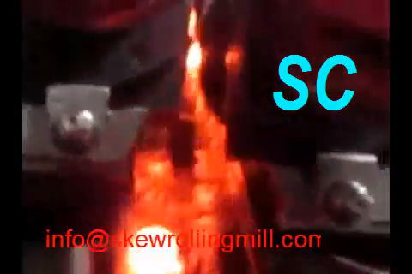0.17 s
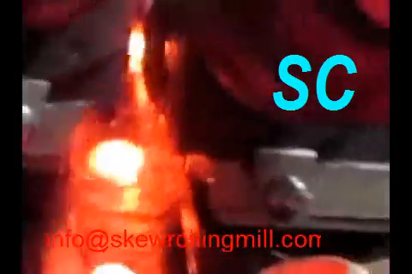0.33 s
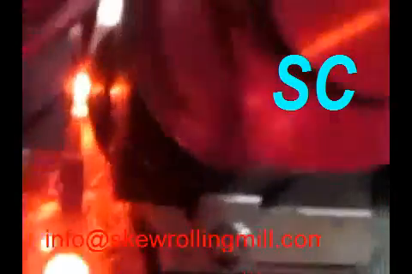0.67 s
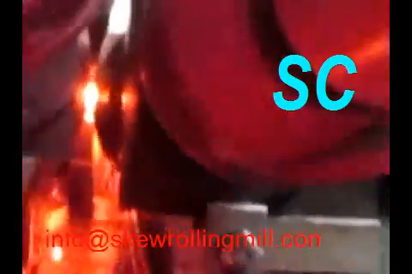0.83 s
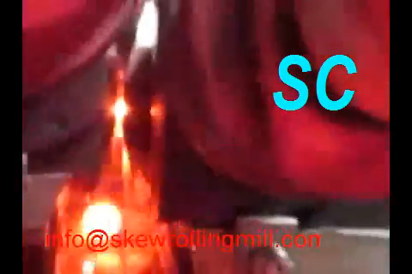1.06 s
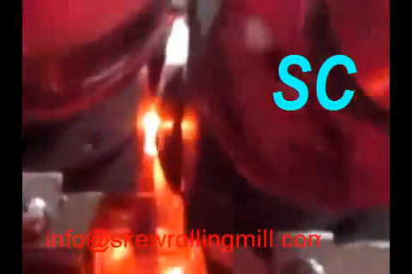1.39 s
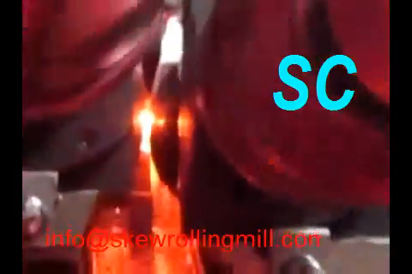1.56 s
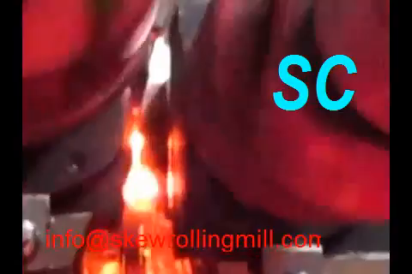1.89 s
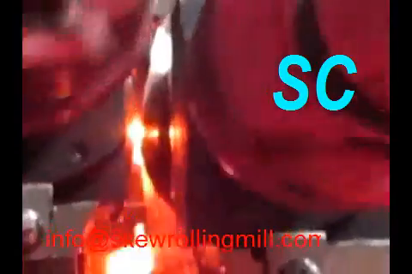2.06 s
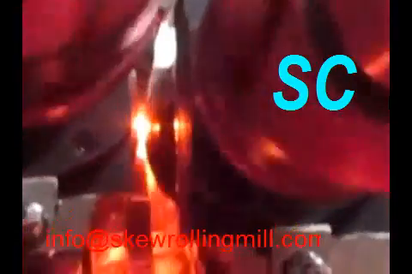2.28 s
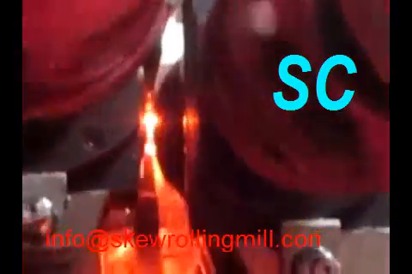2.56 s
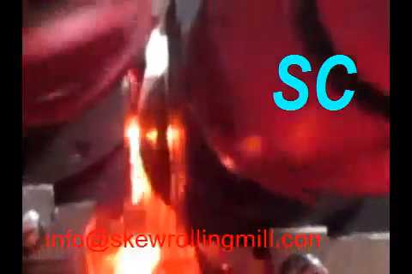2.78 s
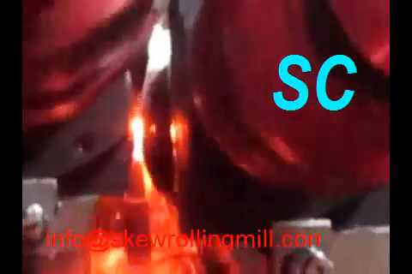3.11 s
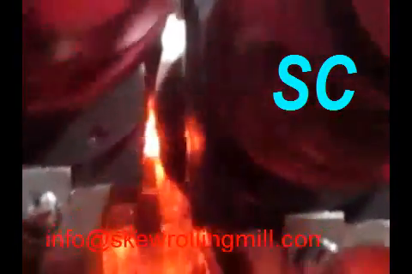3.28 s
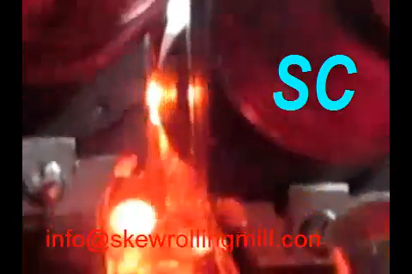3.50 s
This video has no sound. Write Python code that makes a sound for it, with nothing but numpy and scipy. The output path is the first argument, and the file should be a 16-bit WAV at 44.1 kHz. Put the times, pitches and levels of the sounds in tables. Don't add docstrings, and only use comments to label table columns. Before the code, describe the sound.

Dense, steady mill roar with a faint thin whine and pulsing gear tones; irregular hard clanks, hollow knocks and rough crashes of balls throughout, then a low groan stops short; close, dull, clipping microphone, short hall reverberation.

```python
import sys
import numpy as np
from scipy import signal
from scipy.fft import rfft, irfft
from scipy.io import wavfile
from scipy.ndimage import uniform_filter1d

SR = 44100
rng = np.random.default_rng(int(sys.argv[2]) if len(sys.argv) > 2 else 0)


def bounce(signal):
    frames = np.transpose(np.atleast_2d(signal))
    limited = np.clip(frames, -1, 1)
    pcm = np.round(limited * 32767).astype(np.int16)
    wavfile.write(sys.argv[1], SR, pcm)


def gain_from_db(level_db):
    decades = np.asarray(level_db, float) / 20
    return 10 ** decades


N = 160524
T = np.arange(N) / SR
CONTACT_S = .0013
SNAP_DB, SNAP_T60_S = 4, .015

# (time [s], peak [dB], tilt [dB/octave], mode rung hardest
# [Hz])
CLANK_EVENTS = [
    (0.6859, -2, -1, 2229),
    (0.742, -13, 0.5, 3300),
    (0.7944, -12.5, 1.5, 4150),
    (1.361, -1, -2, 3300),
    (1.4514, -12, 2, 4059),
    (2.1065, -5, 1, 1437),
    (2.271, -11.5, -2.5, 2229),
    (2.81, -21, 5.5, 3300),
    (3.0158, -3.5, 2.5, 1437),
]
# (time [s], peak [dB], low body share [dB], t60 [s])
CRASH_EVENTS = [(0.1125, -5.5, -3.5, 0.2), (0.212, -16, -4, 0.42), (0.2956, -10, -28, 0.87),
                (0.575, -18, 1.5, 0.75), (1.1287, -10, -10.5, 0.19), (1.556, -9.5, -11, 0.25),
                (2.0775, -7, -16, 0.25), (2.087, -14.5, -7.5, 0.43), (2.2035, -14.5, -8, 0.48),
                (2.38, -21, -11.5, 0.12), (2.6671, -5.5, 2.5, 0.25), (2.691, -15.5, -17, 0.23),
                (2.8977, -13, -15, 1)]


def unit(x):
    return x / np.sqrt(np.mean(x ** 2))


def curve(table):
    return gain_from_db(np.interp(T, *np.array(table).T))


def band(hz, width_hz):
    return unit(signal.lfilter(*signal.iirpeak(hz, hz / width_hz, SR), rng.standard_normal(N)))


def walk(rate_hz):
    k = int(SR / rate_hz)
    held = np.repeat(rng.standard_normal(N // k + 1), k)
    return 1.57 * uniform_filter1d(uniform_filter1d(held, k), k)[:N]


def tone(hz):
    return np.sin(2 * np.pi * np.cumsum(hz) / SR)


def add(out, at_s, x):
    i = int(at_s * SR)
    out[i:i + len(x)] += x[:N - i]


def decay(t, t60_s):
    return np.exp(-np.log(1000) * t / t60_s)


def fade(t, t60_s):
    return (1 - np.exp(-t / CONTACT_S * 3)) * decay(t, t60_s)


def roar():
    # (frequency [Hz], density [dB/Hz])
    spectrum = [(15, -50.5), (25, -49.5), (268, -12), (497, -7), (744, -12.5), (1090, -12.5), (3400, -19.5),
                (5590, -24.5), (7260, -32.5), (9440, -91.5), (16000, -120)]
    # (time [s], level [dB])
    load_levels = [(0, -19.5), (.33, -18), (.78, -21.5), (1.0, -19), (1.32, -19.5), (2.03, -21),
                   (2.31, -18.5), (2.88, -21), (3.08, -21.5), (3.3, -17), (3.475, -20), (3.49, -24.5),
                   (3.6, -25), (3.64, -23.5)]
    # (time [s], level [dB])
    scrape_levels = [(0.0, -26.5), (0.26, -28.5), (0.5, -27), (0.93, -28), (1.15, -28), (1.26, -26),
                     (1.38, -27), (1.63, -29), (1.78, -28.5), (2.06, -29.5), (2.21, -27), (2.32, -26),
                     (2.45, -28.5), (2.78, -28.5), (3.32, -28.5), (3.64, -32)]
    # (frequency [Hz], width [Hz], level [dB])
    stand_modes = [(98.3, 13, -52.5), (374.5, 13, -42.5), (443.5, 9.1, -39.5), (587.5, 19, -41.5),
                   (692, 16, -37), (840, 36, -35), (924, 12, -38.5), (1060, 72, -33), (1221, 29, -35.5)]
    roar_db, swell_db, flicker_db, scrape_db = -22.5, .5, .9, .8
    load_corner_hz = 1800
    load = unit(curve(load_levels))
    scrape = unit(curve(scrape_levels)) * gain_from_db(scrape_db * walk(14))
    swell = walk(1)
    hz, db = np.array(spectrum).T
    f = np.fft.rfftfreq(N, 1 / SR) + 1
    colour = gain_from_db(np.interp(np.log(f), np.log(hz), db))
    noise = np.zeros(N)
    for mid_hz in 25 * 2 ** np.arange(0, 8.4, 1 / 3):
        share = np.cos(np.clip(np.log2(f / mid_hz) * 3, -1, 1) * np.pi / 2)
        drive = load if mid_hz < load_corner_hz else scrape
        level = drive * gain_from_db(swell_db * swell + flicker_db * walk(9))
        noise += level * irfft(rfft(rng.standard_normal(N)) * colour * share, N)
    stand = sum(gain_from_db(mode_db + 2.0 * walk(4.07)) * band(mode_hz, width_hz)
                for mode_hz, width_hz, mode_db in stand_modes)
    return gain_from_db(roar_db) * unit(noise) + stand * load


def floor_rumble():
    return gain_from_db(-55 + 2.5 * walk(8.6)) * band(40, 25)


def whine():
    level = gain_from_db(-39 + 2.0 * walk(25))
    return level * tone(3423 + 4 * walk(21))


def shaft_hum():
    # (time [s], level [dB])
    hum_levels = [(0.0, -38.5), (0.25, -36.5), (0.32, -55), (0.36, -23.5), (0.65, -51), (0.91, -33.5),
                  (1.11, -54), (1.13, -38), (1.53, -42.5), (1.58, -26.5), (1.9, -41), (3.48, -35.5),
                  (3.59, -57), (3.64, -36.5)]
    return curve(hum_levels) * tone(245.1 + 2.8 * walk(8.2))


def gear_mesh():
    # (frequency [Hz], wander [Hz], level [dB])
    meshes = [(487.8, 4.075, -1.5), (511, 3.98, 0.5)]
    # (start [s], length [s], level [dB], lean toward the upper mesh [dB])
    bites = [(0.076, 0.046, -25.5, -1.5), (0.151, 0.024, -23, 4), (0.203, 0.049, -25, -0.5),
             (0.266, 0.026, -25, 1), (0.329, 0.029, -17.5, 6), (0.376, 0.061, -22, 4),
             (0.447, 0.19, -25.5, -7), (0.881, 0.08, -25, -1.5), (1.147, 0.046, -27.5, -1),
             (1.237, 0.042, -17, 5.5), (1.295, 0.022, -18.5, 7.5), (1.678, 0.13, -22.5, -7),
             (1.835, 0.1, -25, 3), (2.026, 0.06, -24.5, -5.5), (2.198, 0.06, -21.5, 9),
             (2.264, 0.082, -22, 2), (2.373, 0.084, -27, 0), (2.557, 0.075, -29, 5.5),
             (2.667, 0.055, -19.5, 6.5), (2.736, 0.02, -19, -8), (2.77, 0.025, -20.5, 5.5),
             (2.823, 0.096, -26.5, 5), (2.952, 0.048, -26, 2), (3.225, 0.044, -23, 3),
             (3.339, 0.037, -22, 4), (3.409, 0.05, -26.5, 5)]
    idle_db, edge_s = -36, .025
    levels = np.full((2, N), gain_from_db(idle_db))
    for at_s, length_s, db, lean_db in bites:
        to_edge_s = np.minimum(T - at_s, at_s + length_s - T)
        gate = np.clip(to_edge_s / edge_s + .5, 0, 1)
        levels = np.maximum(levels, gain_from_db(db + lean_db * np.array([[-.5], [.5]])) * gate)
    return sum(level * gain_from_db(db) * tone(hz + wander_hz * walk(25))
               for level, (hz, wander_hz, db) in zip(levels, meshes))


def groan():
    start_s, peak_s, end_s = 3.12, 3.33, 3.478
    swell = np.interp(T, [start_s, peak_s, end_s, end_s + .006], [.04, .66, .7, 0])
    return gain_from_db(-22.5 + walk(30)) * swell * band(385, 180)


def clatter():
    per_s, base_db, spread_db, t60_s = 53, -31, 2.5, .056
    out, t = np.zeros(N), T[:SR // 12]
    for place, pitch, size in rng.random((400, 3)):
        at_s = place * 400 / per_s
        if at_s < T[-1]:
            db = base_db - spread_db * np.log(size + .06)
            hz = 900 * 6.5 ** pitch
            add(out, at_s, gain_from_db(db) * fade(t, t60_s) * np.sin(2 * np.pi * hz * t))
    return out


def floor_thumps():
    out, t = np.zeros(N), T[:SR // 2]
    thump = gain_from_db(-43.5) * decay(t, .24) * np.sin(2 * np.pi * 40 * t)
    for at_s, peak_db, *_ in CRASH_EVENTS + CLANK_EVENTS:
        add(out, at_s, gain_from_db(peak_db) * thump)
    return out


def crashes():
    crash_db, hold_s, lead_s = -13.5, .025, .002
    out, t = np.zeros(N), T[:SR // 2]
    bright = gain_from_db(2.0 * walk(120)) * (band(2700, 2300) + gain_from_db(-6.5) * band(5060, 2300))
    body = gain_from_db(.9 * walk(120)) * (band(1043, 210) + band(1270, 210))
    snap = gain_from_db(SNAP_DB - 7) * fade(t, SNAP_T60_S * 2)
    for at_s, peak_db, low_db, t60_s in CRASH_EVENTS:
        i = int(at_s * SR)
        shape = np.minimum(t / CONTACT_S, 1) * decay(np.maximum(t - hold_s, 0), t60_s) + snap
        rush = (np.roll(bright, -i) + gain_from_db(low_db) * np.roll(body, -i))[:len(t)]
        add(out, at_s - lead_s, gain_from_db(peak_db + crash_db) * shape * rush)
    return out


def blows(events, modes, db, hold_s, crack_db=-3, build_s=.012):
    focus_db, focus_octaves, scatter_db = 4.5, .12, 1.5
    crack_t60_s, choke_s = .13, .022
    out, t = np.zeros(N), T[:SR // 3]
    hz, mode_db, t60_s = np.array(modes).T[:, :, None]
    flutter = gain_from_db(2 * walk(220))
    grit = band(4400, 4500)
    choke = np.exp(-(np.maximum(t - hold_s, 0) / choke_s) ** 2)
    envelope = fade(t, t60_s) / decay(np.minimum(t, build_s), t60_s)
    crack_shape = gain_from_db(crack_db) * (fade(t, crack_t60_s) + gain_from_db(SNAP_DB) * fade(t, SNAP_T60_S))
    offsets = 4000 * np.arange(len(modes))[:, None] + np.arange(len(t))
    chance = rng.standard_normal((len(events), 3, len(modes), 1))
    for (at_s, peak_db, tilt_db, focus_hz), (level_dev, pitch_dev, phase_dev) in zip(events, chance):
        i = int(at_s * SR)
        focus = focus_db * np.exp(-(np.log2(hz / focus_hz) / focus_octaves) ** 2)
        level_db = mode_db + focus + scatter_db * level_dev + tilt_db * np.log2(hz / 2500)
        phase = 2 * np.pi * hz * (1 + .0027 * pitch_dev) * t + 3 * phase_dev
        ring = gain_from_db(level_db) * envelope * np.sin(phase) * flutter[(i + offsets) % N]
        crack = crack_shape * np.roll(grit, -i)[:len(t)]
        add(out, at_s, gain_from_db(peak_db + db) * (choke * ring.sum(axis=0) + crack))
    return out


def knocks():
    # (frequency [Hz], level [dB], t60 [s])
    plate = [(1070, 0, .17), (985, -8, .1), (1270, -4, .12), (727, -11, .1), (1530, -10, .08),
             (1170, -8, .1)]
    # (time [s], peak [dB], tilt [dB/octave], mode rung hardest [Hz])
    knock_events = [(0.112, -10, 4, 1076), (0.124, -9.5, 3.5, 1080), (0.139, -15.5, 3, 1070),
                    (0.152, -11, -2.5, 1070), (0.7945, -13.5, -2, 1070), (0.9612, -20, -0.5, 1070),
                    (1.0156, -19, 3.5, 1070), (1.361, -13, -1.5, 1270), (1.7583, -17.5, 1, 1270),
                    (2.1075, -14, -3.5, 1080), (2.15, -12, 4.5, 1070), (2.1878, -12, 2, 1070),
                    (2.5122, -15.5, 0, 1070), (2.6655, -9, 2, 1270), (2.683, -13.5, 1, 1270),
                    (2.702, -20, 1, 1060), (2.8057, -14, 0.5, 1070), (3.1123, -17.5, -0.5, 1070),
                    (3.472, -13.5, 0, 1070)]
    return blows(knock_events, plate, -12, hold_s=.022, crack_db=-22.5)


def ticks():
    # (frequency [Hz], level [dB], t60 [s])
    rail = [(2430, -10, .06), (2760, -10, .06), (2960, -7, .06), (3400, -10, .05), (3880, -6, .06),
            (4350, -5, .07), (4490, -7, .07), (4877, -5, .07), (5400, -8, .06), (6100, -13, .05)]
    # (time [s], peak [dB], tilt [dB/octave], mode rung hardest [Hz])
    tick_events = [(0.359, -10, 4, 4670), (0.6195, -24.5, 2, 3000), (0.661, -14, -2, 4400),
                   (1.2062, -11, 5.5, 4350), (1.5439, -13, -2, 3900), (1.5948, -16.5, 0, 3000),
                   (1.6766, -14, -2, 2760), (1.7699, -19, 3.5, 3400), (1.8105, -9.5, -1.5, 4350),
                   (1.9205, -19.5, -8, 2760), (1.9754, -9, 1.5, 4877), (2.0672, -19.5, -5, 2760),
                   (2.583, -18.5, 0, 3400), (2.629, -7, -3, 4490), (2.7846, -25.5, 2, 3400),
                   (3.1562, -23, -2.5, 3400), (3.481, -14.5, 1, 4490), (3.491, -18, 1, 4490),
                   (3.5214, -14, 7, 4350), (3.529, -14.5, 0, 3900), (3.554, -18, -7, 2430),
                   (3.56, -19, -5, 2430)]
    return blows(tick_events, rail, -15.5, hold_s=.0049, crack_db=3, build_s=.0069)


def clanks():
    # (frequency [Hz], level [dB], t60 [s])
    chute = [(1090, -4, .25), (1437, -1, .24), (1830, -13, .12), (2229, -3, .22), (2767, -9, .1),
             (3245, -4, .12), (3340, -9, .07), (3880, -2, .16), (4059, -9, .1), (4375, -9, .1),
             (4720, -11, .1), (4985, -6, .1), (5480, -7, .12), (6500, -12, .08)]
    # (frequency [Hz], level [dB], t60 [s])
    bracket = [(1240, -12, .1), (1620, -15, .1), (1950, -14, .1), (2490, -13, .1), (3020, -12, .09),
               (3560, -14, .08), (4550, -14, .08), (5190, -14, .08), (5710, -15, .07), (6080, -17, .07)]
    return blows(CLANK_EVENTS, chute + bracket, -16.5, hold_s=.025)


def hall_tail(hits):
    t = T[:SR // 2]
    response = rng.standard_normal(len(t)) * decay(t, .3) * (t > .008)
    response *= gain_from_db(-14) / np.sqrt(np.sum(response ** 2))
    return signal.fftconvolve(hits, response)[:N]


def scene():
    mill = roar() + whine() + shaft_hum() + gear_mesh() + groan()
    hits = floor_rumble() + clatter() + floor_thumps() + crashes() + knocks() + ticks() + clanks()
    return (mill + hits + hall_tail(hits))[None]


def band_limit(x):
    return signal.sosfilt(signal.butter(12, 7410, fs=SR, output="sos"), x)


def record(dry):
    ceiling, top_hz, lag_s = .325, 7150, .0006
    x = signal.sosfilt(signal.butter(2, 5600, fs=SR, output="sos"), dry[0])
    x = x / (1 + (x / ceiling) ** 4) ** .25
    x = signal.sosfilt(signal.butter(6, 6100, fs=SR, output="sos"), x)
    x = signal.sosfilt(signal.ellip(10, .5, 85, top_hz, fs=SR, output="sos"), x) - .002
    x = np.pad(x, (0, int(lag_s * SR)), mode="reflect")[-N:]
    return band_limit(x[None])


dry = scene()
out = record(dry)
bounce(out)
```